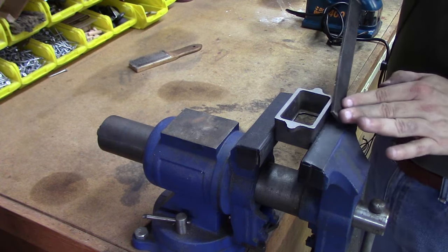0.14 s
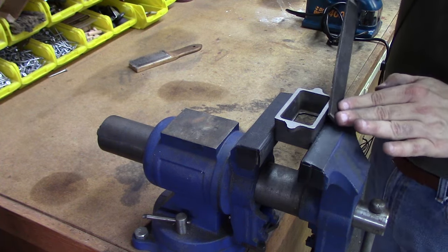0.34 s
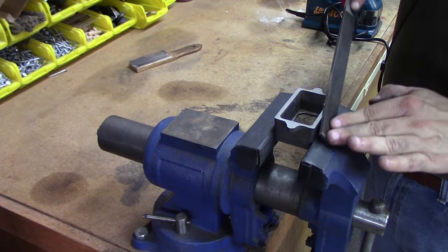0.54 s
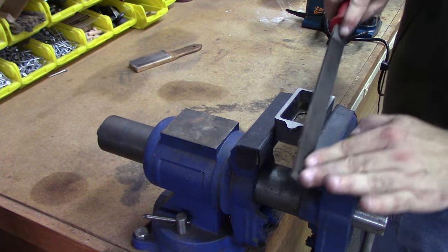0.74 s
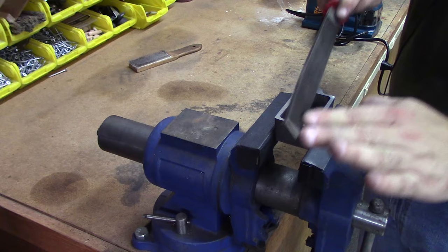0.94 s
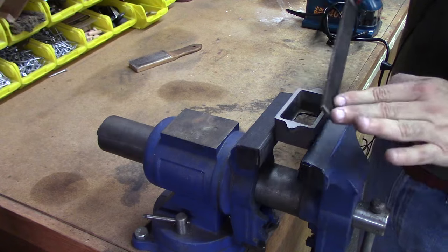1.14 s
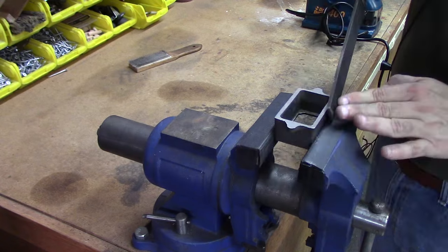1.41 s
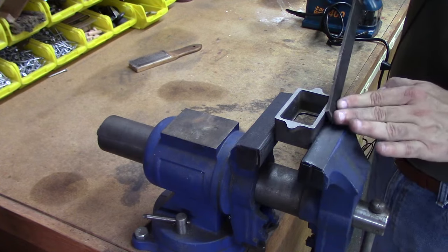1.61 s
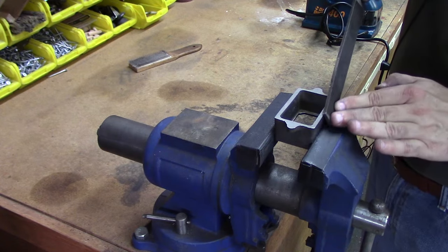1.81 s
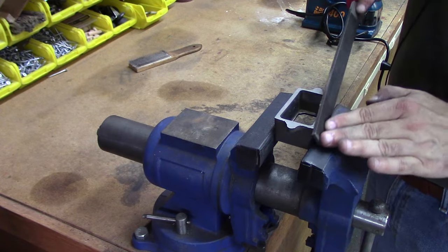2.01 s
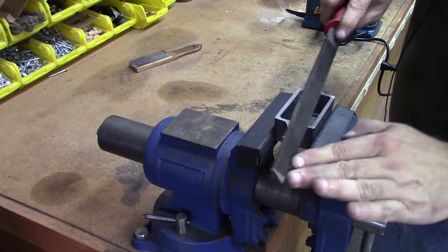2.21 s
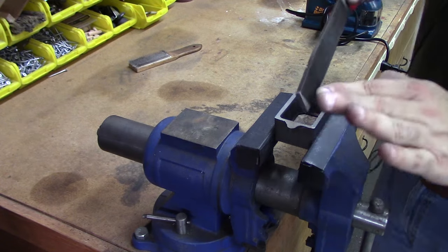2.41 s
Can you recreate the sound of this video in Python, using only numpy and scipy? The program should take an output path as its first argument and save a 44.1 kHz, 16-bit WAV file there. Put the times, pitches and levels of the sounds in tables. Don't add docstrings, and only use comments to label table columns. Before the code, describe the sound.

A metal file rasps twice across a small clamped casting, with light clicks as it lands.

```python
import sys
import numpy as np
from scipy import signal
from scipy.fft import rfft, irfft
from scipy.io import wavfile
from scipy.ndimage import uniform_filter1d

SR = 44100
rng = np.random.default_rng(int(sys.argv[2]) if len(sys.argv) > 2 else 0)


def volts_from_db(level):
    exponent = np.asarray(level, float) / 20
    return 10 ** exponent


def dump(signal):
    limited = np.clip(np.atleast_2d(signal).T, -1, 1)
    pcm = np.round(limited * 32767).astype(np.int16)
    wavfile.write(sys.argv[1], SR, pcm)


N = 112454
TIME = np.arange(N) / SR


def evened(x):
    return x / np.sqrt(np.mean(x ** 2) + 1e-20)


def read(points, hz):
    f, value = np.transpose(points)
    return np.interp(np.log(hz + 1), np.log(f + 1), value)


def coloured(x, points):
    hz = np.fft.rfftfreq(len(x), 1 / SR)
    closed = [(points[0][0] / 2, points[0][1] - 30)] + list(points)
    return irfft(rfft(x) * volts_from_db(read(closed, hz)), len(x))


def resonate(x, hz, width):
    r = np.exp(-np.pi * abs(width) / SR)
    return 2 * signal.lfilter([1 - r], [1, -r * np.exp(2j * np.pi * hz / SR)], x).real


def glide(x, hz, width):
    turn = np.exp(2j * np.pi * np.cumsum(hz) / SR)
    r = np.exp(-1.5 * np.pi * abs(width) / SR)
    smooth = signal.lfilter([(1 - r) ** 2], [1, -2 * r, r * r], x / turn + 1e-18)
    return 2 * (turn * smooth).real


def slow(seconds):
    span = max(int(seconds * SR), 2)
    return evened(uniform_filter1d(uniform_filter1d(rng.standard_normal(N), span), span))


def arch(start, end, lean):
    return np.sin(np.pi * np.clip((TIME - start) / (end - start), 0, 1) ** lean)


# (time [s], pressure [dB], brightness [dB per octave])
STROKES = [
    [(0.394, -36.5, -8), (0.43, -31.5, -5), (0.468, -24, -5), (0.56, -23.5, -2.5), (0.638, -21.5, -3.5),
     (0.70, -23, 0.5), (0.81, -22.5, 1), (0.851, -21, -3.5), (0.858, -26, -8)],
    [(1.792, -53.5, -5), (1.82, -40.5, -25), (1.86, -31, -8), (1.93, -28, -3), (2.0, -25, -2),
     (2.1, -24.5, -2), (2.2, -26.5, 3), (2.24, -24.5, -0.5), (2.258, -42, -8)],
]
# (start [s], end [s])
DRAG_TIMES = [
    (.25, .394),
    (1.505, 1.568),
    (1.568, 1.59),
]
# (level [dB], change over the drag [dB])
DRAGS = [(-53, 9), (-62.5, 1), (-62, -9)]
# (time [s], jump [dB], length [s])
CATCHES = [(0.388, 7, 0.0045), (0.43, 0, 0.0049), (0.447, 3, 0.0015), (0.456, -2, 0.0028), (0.689, 8, .004),
           (0.691, 4.5, .003), (0.697, 5.5, 0.0037), (0.737, -1.5, 0.0028), (0.809, 1.5, 0.0053),
           (1.796, 4, 0.0028), (1.807, 3, .004), (1.82, 1.5, 0.0045), (1.962, 0, 0.0057),
           (2.098, 2, 0.0026), (2.14, 5, 0.0075), (2.172, 4.5, 0.0036), (2.176, -1, 0.0032),
           (2.205, -0.5, 0.0043)]


def hand():
    press, place = np.zeros(N), np.zeros(N)
    tilt = np.full(N, -11.0)
    for table in STROKES:
        s, db, bright = np.transpose(table)
        on = (TIME >= s[0]) & (TIME < s[-1])
        press += on * volts_from_db(np.interp(TIME, s, db))
        place += on * (TIME - s[0]) / (s[-1] - s[0])
        tilt = np.where(on, np.interp(TIME, s, bright), tilt)
    for (start, end), (db, fade_db) in zip(DRAG_TIMES, DRAGS):
        on = (TIME >= start) & (TIME < end)
        press += on * volts_from_db(db + fade_db * (TIME - start) / (end - start))
    for s, db, length in CATCHES:
        decay = np.exp(-np.maximum(TIME - s, 0) / max(length, .001))
        press = press * volts_from_db(db * (TIME >= s) * decay)
    return uniform_filter1d(press, size=40), place, tilt


def teeth():
    bites_per_s, spread_db, chatter_db, chatter_s = 14000, 0.8, 0.4, 0.008
    size = volts_from_db(spread_db * np.minimum(rng.exponential(1, N), 3))
    size = size * (rng.random(N) < bites_per_s / SR)
    sign = rng.choice([-1., 1.], N)
    return evened(size * sign * volts_from_db(chatter_db * slow(chatter_s)))


# (frequency [Hz], level [dB per Hz])
SCRAPE = [(120, -28.5), (200, -8.5), (465, -10), (1810, -9.5), (2860, 1), (4430, -3.5), (6400, -0.5),
          (9930, -3.5), (16000, -17.5)]


def scrape(bites, unit, tilt):
    whole = volts_from_db(-1) * coloured(bites, SCRAPE) / coloured(unit, SCRAPE).std()
    dull = signal.lfilter(*signal.butter(4, 6500, fs=SR), whole)
    top = whole - signal.lfilter(*signal.butter(4, 11000, fs=SR), whole)
    upper = whole - dull - top
    return dull + upper * volts_from_db(0.9 * tilt) + top * volts_from_db(1.7 * tilt)


# (frequency [Hz], width [Hz], level [dB])
BODY = [(352.5, 44, -9), (550, 39, -11), (1318, 610, -18), (2527, 160, -6.5), (2840, 200, -4),
        (3637, 740, -10), (4910, 530, -12), (6270, 170, -1.5), (6870, 381, -6), (8040, 650, -7.5),
        (9790, 430, -5), (10730, 315, -12.5), (11850, 490, -14), (14100, 270, -27.5)]


def casting(bites, tilt):
    wander_db, wander_s = 2, 0.02
    out = np.zeros(N)
    for hz, width, db in BODY:
        octaves = max(np.log2(hz / 4000), 0.3)
        level = volts_from_db(db + wander_db * slow(wander_s) + tilt * octaves)
        out += 2.03 * glide(bites * level, np.full(N, hz), width)
    return out


# (start [s], end [s], first frequency [Hz], last frequency [Hz], width [Hz])
SINGS = [(.39, .59, 5250, 5450, 420), (.42, .51, 310, 345, 40), (.45, .72, 2800, 3050, 300),
         (.57, .67, 355, 375, 35), (.64, .71, 5500, 5300, 900), (.645, .69, 1100, 1100, 400),
         (.67, .90, 2400, 2620, 260), (.71, .91, 5330, 5050, 230), (.70, .88, 9800, 9740, 220),
         (.73, .89, 8200, 8120, 200), (.75, .795, 7150, 7140, 90), (.68, .90, 6500, 6400, 250),
         (.81, .88, 1320, 1320, 80), (1.81, 2.02, 5000, 5400, 450), (1.93, 2.09, 2700, 2600, 150),
         (1.97, 2.19, 6250, 6400, 200), (1.99, 2.11, 345, 355, 30), (2.04, 2.22, 3020, 2840, 150),
         (2.09, 2.18, 6800, 7000, 400), (2.16, 2.28, 5250, 5080, 230), (2.185, 2.27, 2620, 2570, 130),
         (2.205, 2.27, 9780, 9650, 420), (2.19, 2.26, 10950, 10850, 300), (.79, .86, 8250, 8150, 160),
         (1.79, 1.93, 12200, 11800, 1200), (2.195, 2.25, 7100, 7050, 150)]
SING_DB = [3, -3, -22, -3, -0.5, -9, -0.5, 3.5, -3, -2.5, 4, -0.5, -13.5, -5, -8, -1.5, 2, 1.5, -12, 3.5, 8,
           4, 0.5, -1, -28, -5]


def singing(bites):
    flutter_db, flutter_s = 1.5, .005
    out = np.zeros(N)
    for (start, end, first_hz, last_hz, width), db in zip(SINGS, SING_DB):
        near = slice(int(start * SR), int((end + .1) * SR))
        drive = bites * volts_from_db(db + flutter_db * slow(flutter_s)) * np.sqrt(arch(start, end, 0.77))
        pitch = np.interp(TIME[near], [start, end], [first_hz, last_hz])
        out[near] += 3.04 * glide(drive[near], pitch, width)
    return out


# (frequency [Hz], width [Hz], level [dB])
FILE = [(2600, 31, -15), (4690, 100, -12), (7000, 42, -9.5), (8270, 10.5, -7.5), (1807, 22, -13)]


def steel(bites, place):
    base_db, growth_db = -10.5, 13
    out = np.zeros(N)
    for hz, width, db in FILE:
        out += 5 * glide(bites * volts_from_db(db + base_db + growth_db * place), np.full(N, hz), width)
    return out


def rasp():
    press, place, tilt = hand()
    unit = teeth()
    bites = press * unit
    work = scrape(bites, unit, tilt) + casting(bites, tilt)
    sung = singing(bites) + steel(bites, place)
    return work, sung


# (time [s], peak [dB], brightness [dB per octave], thud [dB], damping factor)
TAPS = [
    (0.2421, -4.5, 3, -42, 1.02),
    (1.498, -23.5, -4.5, -18.5, 0.9),
    (1.569, -42, -7, -27, 0.53),
    (1.579, -48, -4, -31, 1.3),
]
# (frequency [Hz], width [Hz], level [dB])
TAP_MODES = [(1189, 168, -4.5), (2660, 120, -0.5), (3730, 180, 1.5), (5100, 230, 8), (6700, 460, -1),
             (6840, 240, -12), (8100, 400, -25.5), (9960, 260, -22.5), (13770, 110, -38)]
# (frequency [Hz], width [Hz], level [dB])
TAP_RING = (5120, 45, -27)


def taps():
    rise_s, echo_s, echo_db = .00015, .00079, -1.5
    crack_tone = [(300, -12), (1200, 5.0), (2500, 5.0), (6000, 0.5), (9000, -11.0), (16000, -50)]  # (Hz, dB)
    out, t = np.zeros(N), np.arange(4000) / SR
    for s, db, tilt, thud_db, damp in TAPS:
        ring = np.zeros(len(t))
        for hz, width, level in [*(np.array(TAP_MODES) * [1, damp, 1]), TAP_RING]:
            decay = volts_from_db(level + tilt * np.log2(hz / 4000)) * np.exp(-np.pi * width * t)
            ring += decay * np.sin(2 * np.pi * hz * t)
        ring = ring * np.minimum(t / rise_s, 1)
        second = np.interp(t - echo_s, t, ring, left=0)
        ring = ring + volts_from_db(echo_db * damp ** 3) * second
        fade = volts_from_db(-22) * np.exp(-t / .002) + volts_from_db(-21) * np.exp(-t / .017)
        crack = fade * evened(coloured(rng.standard_normal(len(t)), crack_tone))
        thud = volts_from_db(thud_db) * np.exp(-t / 0.03) * np.sin(2 * np.pi * 560 * t)
        out[round(s * SR):][:len(t)] += volts_from_db(db) * (ring / abs(ring).max() + thud + crack)
    return out


# (start [s], end [s], frequency [Hz], level [dB])
AFTER = [(0.29, .34, 3720, -55), (0.24, 0.3, 2700, -60), (0.91, 0.9, 7600, -55), (.855, 0.982, 2760, -46),
         (.97, 1.17, 8400, -64.5), (1.51, 1.515, 5120, -51), (1.44, 1.585, 3100, -61),
         (1.6, 1.585, 2560, -55.5), (2.285, 2.31, 2580, -34), (2.24, 2.28, 10000, -46),
         (2.33, 2.36, 1810, -43), (2.22, 2.15, 12000, -54), (0.97, 1.4, 1500, -56), (2.9, 3, 1800, -67)]


def after():
    width_hz, fade_db = 17, -11.5
    out = np.zeros(N)
    for start, end, hz, db in AFTER:
        level = volts_from_db(db + fade_db * (TIME - start) / (end - start)) * arch(start, end, 0.82) ** 0.2
        out += level * evened(resonate(rng.standard_normal(N), hz, width_hz))
    return out


# (start [s], end [s])
RUB_TIMES = [(0.0, .08), (.87, 1.26), (1.17, 1.2), (2.26, 2.52), (1.5, 1.64), (.86, 1.1), (2.36, 2.55)]
# (level [dB], centre [Hz], width [Hz])
RUBS = [(-57, 1400, 220), (-60, 1110, 94), (-60.5, 1660, 69), (-51.5, 1410, 180), (-54, 580, 260),
        (-49, 230, 1600), (-51, 590, 680)]


def rubs():
    out = np.zeros(N)
    for (start, end), (db, hz, width) in zip(RUB_TIMES, RUBS):
        level = volts_from_db(db + 2.5 * slow(.015)) * arch(start, end, 0.57)
        out += level * evened(resonate(rng.standard_normal(N), hz, width))
    return out


# (frequency [Hz], t60 [s])
SHOP = [(300, 1), (1200, 0.95), (2600, 0.5), (5000, 0.38), (8100, 0.4), (9700, 0.2), (11000, 0.31),
        (14000, 0.24)]


def shop(x):
    echo = np.zeros(SR)
    at = np.arange(200, SR - 20, 20)
    echo[at + rng.integers(0, 20, len(at))] = rng.choice([-1., 1.], len(at))
    hz, t, z = signal.stft(echo, SR, nperseg=256)
    t60 = np.maximum(read(SHOP, hz), .05)[:, None]
    tail = signal.istft(z * volts_from_db(-60 * t / t60), SR, nperseg=256)[1]
    return signal.fftconvolve(x, tail / np.linalg.norm(tail))[:N]


# (time [s], level [dB])
RUMBLE = [(0.0, -54), (0.01, -34), (0.19, -43), (0.449, -36), (0.47, -39.5), (0.74, -33.5), (0.79, -42),
          (0.87, -31.5), (0.96, -38.5), (1.261, -39.5), (1.281, -32.5), (1.45, -49), (1.55, -35),
          (1.669, -43.5), (1.931, -36.5), (1.95, -36.5), (2.52, -38), (2.55, -39.5)]
# (frequency [Hz], level [dB per Hz])
RUMBLE_TONE = [(8.8, -20.5), (15, 2), (48, 1), (135, -11), (296, -20), (326, -17), (358, -27.5),
               (400, -21.5), (520, -32), (880, -120)]


def rumble():
    s, db = np.transpose(RUMBLE)
    level = volts_from_db(np.interp(TIME, s, db) + 0.32 * slow(0.072))
    return level * evened(coloured(rng.standard_normal(N), list(RUMBLE_TONE) + [(800, -73.5)]))


# (frequency [Hz], level [dB per Hz])
HISS = [(150, -15.5), (250, -8.5), (298, -18), (386, -12.5), (538, -15), (586, -11.5), (1260, -25),
        (2200, -28.5), (16000, -37.5)]


def hiss():
    return volts_from_db(-56.5) * evened(coloured(rng.standard_normal(N), HISS))


# (frequency [Hz], level [dB per Hz])
WIDTH = [(88, -34.5), (150, -8.5), (321, -5), (821, -8.5), (5680, -10), (14200, -13.5), (16000, -19)]


def side_hiss():
    return volts_from_db(-68) * evened(coloured(rng.standard_normal(N), WIDTH))


def scene():
    work, sung = rasp()
    knocks = taps()
    to_room = volts_from_db(-10.5) * (work + volts_from_db(-7) * sung) + volts_from_db(-14) * knocks
    mid = work + sung + knocks + after() + rubs() + shop(to_room) + rumble() + hiss()
    side = side_hiss()
    return np.array([mid + side, mid - side])


def top_cut(x):
    return signal.sosfilt(signal.butter(12, 16810, fs=SR, output="sos"), x)


def record(dry):
    edge = signal.firwin(511, 15500, window=("kaiser", 9), fs=SR)
    mix = signal.oaconvolve(dry, edge[None], "same")
    return top_cut(mix)


dry = scene()
out = record(dry)
dump(out)
```